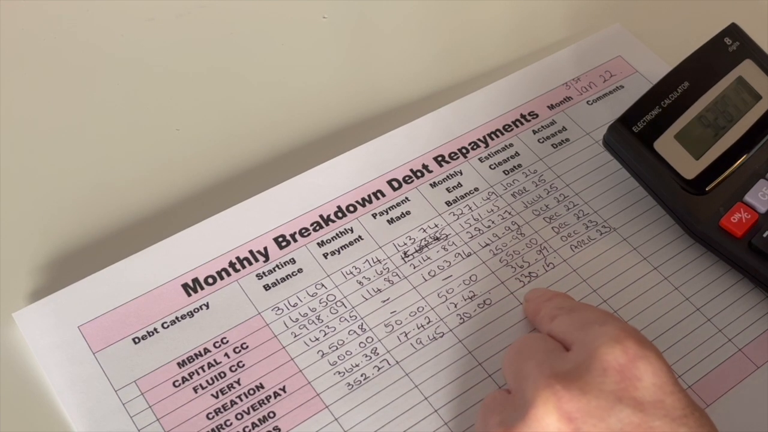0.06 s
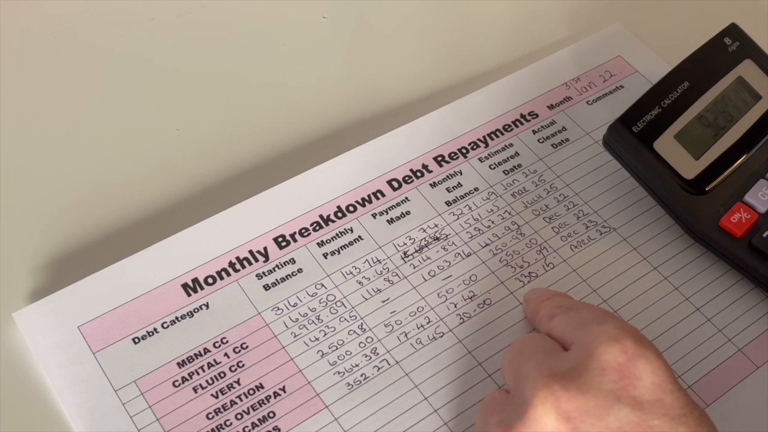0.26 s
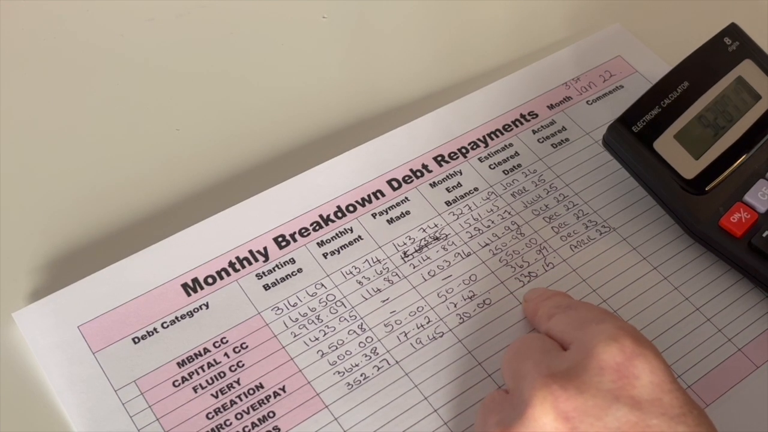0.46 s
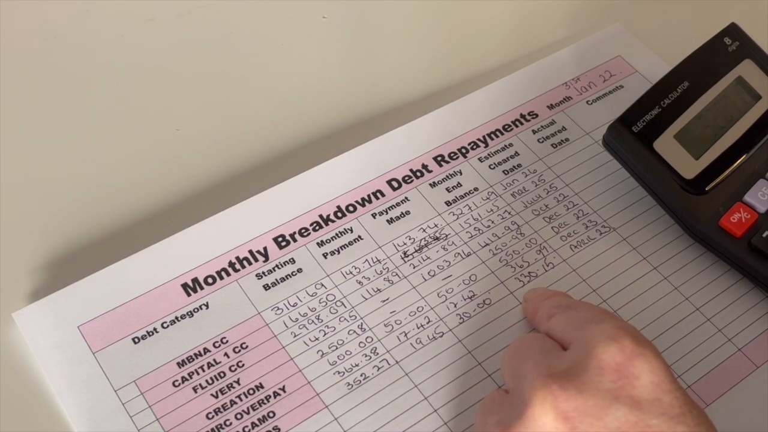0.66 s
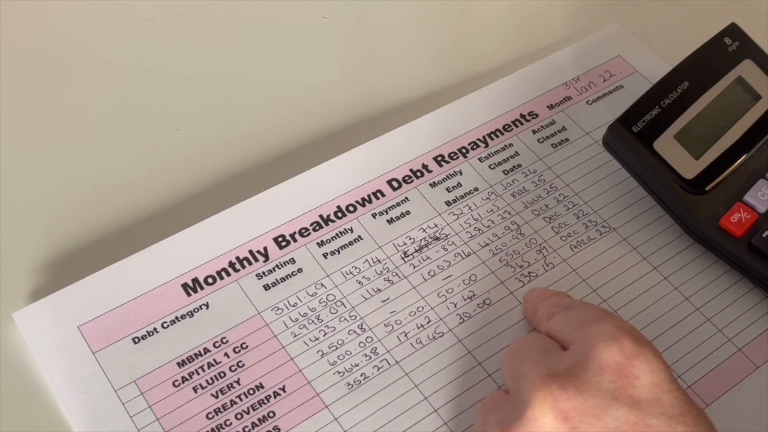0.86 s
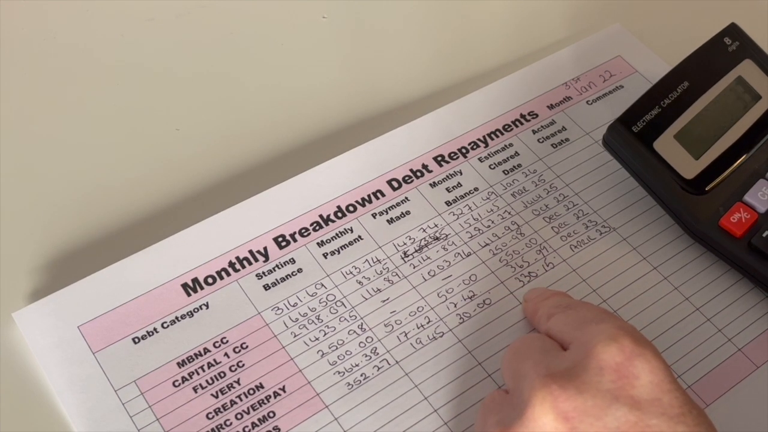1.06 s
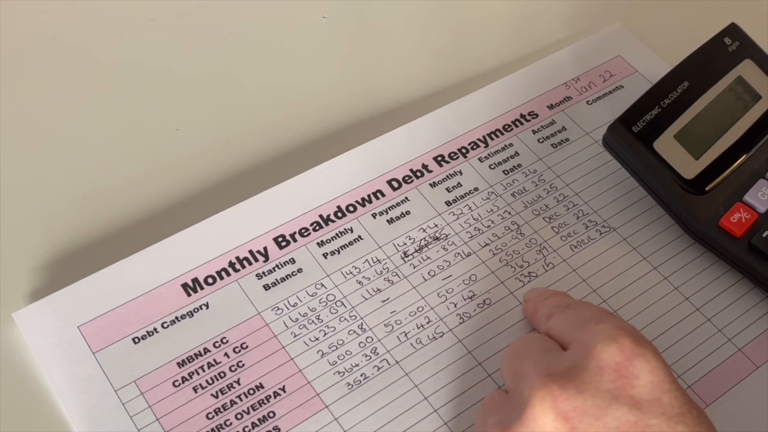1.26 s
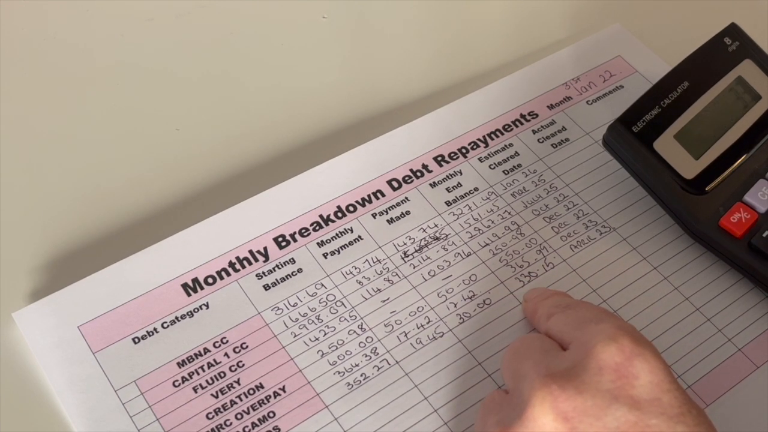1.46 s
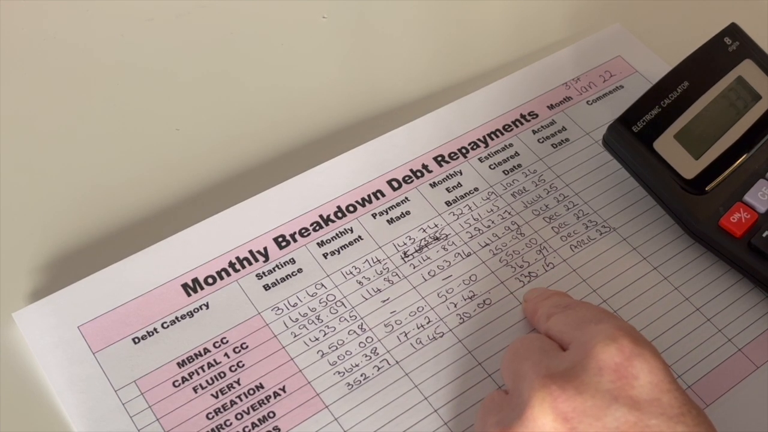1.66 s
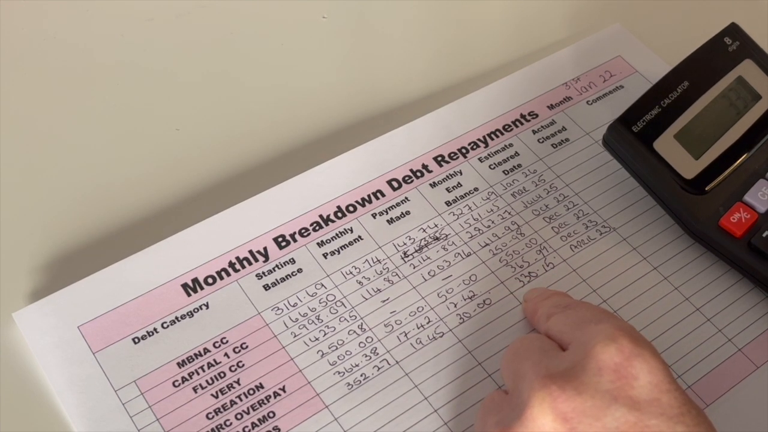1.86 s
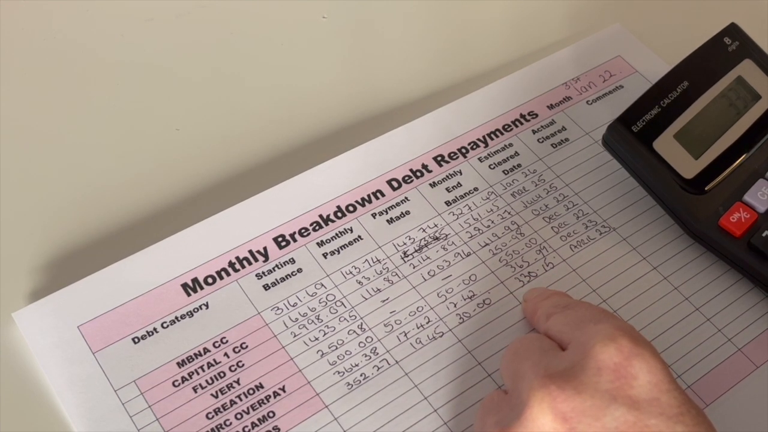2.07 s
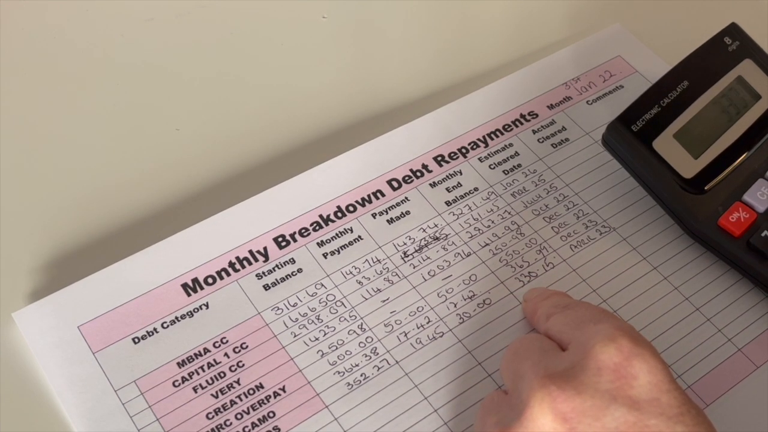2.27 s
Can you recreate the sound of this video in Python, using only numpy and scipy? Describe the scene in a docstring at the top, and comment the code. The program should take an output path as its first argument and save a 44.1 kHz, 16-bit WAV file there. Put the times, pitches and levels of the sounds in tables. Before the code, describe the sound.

Calculator buttons pressed one by one on a desk, dull thumps and clacking springbacks, quiet room

```python
"""A hand slides over paper in a small quiet room, over a low rumble; it slides again near the end.
Close to the microphone pair, five keys of a plastic desk calculator are tapped. Each key ticks under the finger
and bottoms out with a thump of calculator and desk; a tenth of a second later it springs back and the keycap
rattles against the case. Filtered noise makes the paper, pats, clicks, clatter and reflections; decaying
sines make the thumps and the ring of case and keycaps, and a falling sine the rubber dome of four keys."""
import sys
import numpy as np
from scipy import signal
from scipy.fft import rfft, irfft, next_fast_len
from scipy.io import wavfile

SR = 44100
rng = np.random.default_rng(int(sys.argv[2]) if len(sys.argv) > 2 else 0)


def materialize(psi):
    """Save the field psi as 16-bit PCM at rate SR to the path in sys.argv[1].

    A 1-D psi becomes a single channel; in a 2-D psi each row is a channel.
    """
    bounded = np.clip(np.atleast_2d(psi).T, -1, 1)
    quanta = np.round(bounded * 32767).astype(np.int16)
    wavfile.write(sys.argv[1], SR, quanta)


N = 101782
T = np.arange(N) / SR
SIZE = next_fast_len(N + SR // 2)
FREQS = np.maximum(np.arange(SIZE // 2 + 1) * SR / SIZE, 1)


def undb(db):
    """Decibels to gain."""
    return 10 ** (np.asarray(db) / 20)


def curve(points):
    """(frequency [Hz], value) points joined on a log-frequency axis."""
    hz, value = np.array(points, float).T
    return np.interp(np.log(FREQS), np.log(hz), value)


def level_over_time(points):
    """(time [s], level [dB]) points joined in decibels, returned as gain."""
    return undb(np.interp(T, *np.array(points).T))


def causal(db):
    """Minimum-phase response with the given gain per frequency, by folding the cepstrum."""
    cepstrum = irfft(np.log(undb(db)), SIZE)
    cepstrum[1:SIZE // 2] *= 2
    cepstrum[SIZE // 2 + 1:] = 0
    return np.exp(rfft(cepstrum))


def colour(points):
    """Causal response that keeps the power of white noise."""
    response = causal(curve(points))
    return response / np.sqrt(np.mean(abs(response) ** 2))


def through(x, response):
    """Filter a sound by a frequency response."""
    return irfft(rfft(x, SIZE) * response, SIZE)[..., :N]


def noise():
    """Two unrelated white noises."""
    return rng.standard_normal((2, N))


def fade(age, t60):
    """Exponential decay by 60 dB in t60 seconds."""
    return np.exp(-np.log(1000) * np.maximum(age, 0) / t60)


def since(start):
    """Seconds since a moment, zero before it."""
    return np.maximum(T - start, 0)


def swell_in(age, rise):
    """Exponential approach to full level."""
    return 1 - np.exp(-age / rise)


def ring(age, hz, t60, rise):
    """One mode that swells briefly and dies away."""
    return -np.sin(2 * np.pi * hz * age) * fade(age, t60) * swell_in(age, rise)


# how unlike the two microphones hear a sound: (frequency [Hz], share of unrelated sound [0-1])
PORT_SPREAD = [(60, 0.03), (120, 0.06), (250, 0.084), (600, 0.59), (1300, 1), (2300, 0.05), (4400, 0.017),
               (8000, .2), (15000, 0.44)]


def spread(pair):
    """Two unrelated sounds to left and right, as alike as the microphones hear them."""
    share = np.clip(curve(PORT_SPREAD), 0, 1) / 2
    mid = through(pair[0], np.sqrt(1 - share))
    side = through(pair[1], np.sqrt(share))
    return np.array([mid + side, mid - side])


# hand on paper: (start [s], fullest [s], end of hold [s], fade [s], level [dB])
SLIDES = [(0.0, 0.164, 0.22, 0.085, -65), (1.913, 1.967, 2.075, 0.14, -65.5)]
SLIDE_START_DB = -15  # relative to the fullest level
# hiss of the sheet: (frequency [Hz], relative level [dB per Hz])
PAPER_HISS = [(100, -70), (400, 5), (800, -6), (1550, -1.5), (1800, 1), (3000, -2), (5000, -6.5),
              (5700, -9), (7200, -12), (9500, -16), (12000, -12), (14300, -21), (15200, -72)]
# duller rubbing: (time [s], level [dB]), then its spectrum (frequency [Hz], relative level [dB per Hz])
RUB_LEVEL = [(0, -66.5), (0.1, -93), (0.26, -65), (0.36, -66.5), (0.43, -74.5), (0.52, -100)]
RUB = [(300, 8.5), (1000, -11), (1600, -8), (2000, 1.5), (2500, -16), (3500, -18), (6000, -28.5),
       (14000, -39)]
# low rumble of the hand on the desk: (time [s], level [dB]), then (frequency [Hz], relative level [dB per Hz])
RUMBLE_LEVEL = [(0, -57), (0.15, -61.5), (0.45, -60.5), (0.7, -58), (1.05, -60.5), (1.2, -82.5),
                (1.501, -61.5), (2.3, -59)]
RUMBLE = [(25, -9), (65, 9), (130, -7), (170, -17), (240, -5.5), (380, -20), (600, -25.5), (1200, -41),
          (4000, -53)]


def paper(grain_db=0.5, grain_hz=60):
    """The hand slides over the sheet: a grainy hiss that swells, holds and stops, a duller rub and a low rumble."""
    slide_level = np.zeros(N)
    for start, full, end, release, db in SLIDES:
        swell = undb(SLIDE_START_DB * np.clip((full - T) / (full - start), 0, 1))
        stop = np.clip(1 - since(end) / release, 0, 1) ** 2
        slide_level += undb(db) * (T >= start) * swell * stop
    slow_noise = through(noise()[0], colour([(grain_hz, 0), (grain_hz * 10, -60)]))
    grain = undb(grain_db * slow_noise)
    hiss = slide_level * through(noise(), colour(PAPER_HISS))
    rub = level_over_time(RUB_LEVEL) * through(noise(), colour(RUB))
    rumble = level_over_time(RUMBLE_LEVEL) * through(noise(), colour(RUMBLE))
    return spread(grain * (hiss + rub) + rumble)


# still room: (frequency [Hz], relative level [dB per Hz])
FLOOR = [(20, -30.5), (35, -5), (58, 3), (90, -4), (130, -11.5), (170, -16.5), (240, -21), (400, -27.5),
         (700, -32), (1300, -41), (2100, -42), (4000, -51), (7000, -53), (12000, -57.5), (16000, -76)]
FLOOR_DB = -59.5


def still_room():
    """The quiet room itself: steady noise, strongest in the bass."""
    return spread(through(noise(), colour(FLOOR))) * undb(FLOOR_DB)


# keycap touches its guide or stop: (time [s], level [dB], treble tilt [dB per octave])
CLICKS = [(0.5495, -61.5, -9.5), (0.5575, -44.5, -3.5), (0.5657, -59, -7), (0.6543, -52, -2.5),
          (0.668, -54, -7), (0.6704, -41.5, 2.5), (0.6724, -44, 2.5), (0.8268, -57, -8),
          (0.8342, -55.5, -6), (0.8380, -44, -0.5), (0.9517, -38, 3), (0.9540, -36.5, 0), (0.9602, -47, -3),
          (1.221, -79, 1), (1.489, -54.5, -4), (1.4971, -47.5, -4.5), (1.5068, -42.5, -3.5),
          (1.6005, -56.5, -13), (1.6051, -41, -0.5), (1.6109, -39, -0.5), (1.6223, -52.5, -11.5),
          (1.631, -50, -12), (1.7786, -57.5, -3), (1.7870, -52, -8), (1.7922, -51.5, -3),
          (1.7982, -59.5, -3.5), (1.9033, -50, -10), (1.9083, -37.5, -1), (1.9142, -34, 2.5),
          (1.922, -47, -9.5), (2.1147, -59.5, -3.5), (2.123, -54, -3), (2.1288, -47.5, -2),
          (2.225, -64, -5), (2.2298, -39, -1.5), (2.235, -49, -2), (2.2409, -48.5, 0)]
# keycap click: (frequency [Hz], relative level [dB per Hz])
KEYCAP = [(100, -15), (500, -2), (1000, -4.5), (1500, 0), (2500, 1.5), (3300, -0.5), (4000, 4), (4900, 4),
          (5900, -8), (6800, -7), (9500, -11), (12300, -8.5), (14000, -15.5), (16000, -48.5)]
# keycap ring: (frequency [Hz], relative level [dB], t60 [s])
KEYCAP_MODES = [(2613, -2, 0.026), (3950, -13.5, 0.038), (4565, -9, 0.018), (4676, -18, 0.013),
                (6640, -24, 0.029), (10800, -6, 0.02), (12570, -13.5, 0.016)]
# detune is a fraction of the mode frequency; detune and scatter are standard deviations
KEYCAP_RING_DB, KEYCAP_DETUNE, KEYCAP_SCATTER_DB = -4.5, 0.021, -2.5
CLICK_RISE_S, CLICK_HOLD_S, CLICK_T60_S = 0.00073, .0012, .014
TILT_PIVOT_HZ = 3590


def keycaps():
    """Loose plastic keys click with a short burst of noise at each contact and ring briefly."""
    out, plastic = np.zeros((2, N)), colour(KEYCAP)
    octaves = np.clip(np.log2(FREQS / TILT_PIVOT_HZ), -2, 2)
    for start, db, tilt_db in CLICKS:
        age = since(start)
        burst = np.minimum(age / CLICK_RISE_S, 1) * fade(age - CLICK_HOLD_S, CLICK_T60_S)
        click = through(burst * noise(), plastic)
        near = (age > 0) & (age < .05)  # the modes are computed for 50 ms only
        for hz, mode_db, t60 in KEYCAP_MODES:
            detune, size = rng.standard_normal((2, 2, 1))
            gain = undb(KEYCAP_RING_DB + mode_db + KEYCAP_SCATTER_DB * size)
            click[:, near] += gain * ring(age[near], hz * (1 + KEYCAP_DETUNE * detune), t60, CLICK_RISE_S)
        out += through(click, undb(db + tilt_db * octaves))
    return spread(out)


# fingertip lands and pushes the key down: (time [s], level [dB])
TOUCHES = [(0.551, -52.5), (0.828, -47.5), (1.493, -43), (1.7860, -46), (2.1220, -39.5)]
# soft pad on plastic: (frequency [Hz], relative level [dB per Hz])
PAD = [(60, -10), (230, 2), (450, -12), (800, -9.5), (1300, -23.5), (4000, -39), (12000, -39)]
TOUCH_RISE_S, TOUCH_T60_S = 0.0035, 0.074


def touches():
    """The finger pad gives a dull pat, a soft burst of noise, just before each key bottoms out."""
    level = np.zeros(N)
    for start, db in TOUCHES:
        age = since(start)
        level += undb(db) * np.minimum(age / TOUCH_RISE_S, 1) * fade(age, TOUCH_T60_S)
    return spread(through(level * noise(), colour(PAD)))


# key bottoms out, then key springs back, both as: (time [s], desk boom [dB],
# calculator rocking on its feet [dB], knock of the case [dB], contact bandwidth [Hz])
PRESSES = [(0.5609, -38.5, -27.5, -44, 855), (0.839, -41.5, -24.5, -34.5, 500), (1.5, -27, -40, -38, 740),
           (1.7919, -28, -64, -35, 390), (2.1270, -28.5, -25, -45, 820)]
RELEASES = [(0.6714, -49, -38.5, -40.5, 2460), (0.9526, -43.5, -36.5, -37, 1750),
            (1.6104, -72, -30, -32.5, 4100), (1.9136, -43, -28.5, -34, 5960),
            (2.2367, -65, -45.5, -43.5, 4000)]
DESK_HZ, DESK_T60_S = 87.85, 0.3
FEET_HZ, FEET_T60_S = 125.3, 0.16
THUMP_RISE_S = 0.0044


def thumps():
    """Every press and release rocks the calculator on its feet and makes the desk boom: two low modes."""
    out = np.zeros(N)
    for start, desk_db, feet_db, _, _ in PRESSES + RELEASES:
        age = since(start)
        out += undb(desk_db) * ring(age, DESK_HZ, DESK_T60_S, THUMP_RISE_S)
        out += undb(feet_db) * ring(age, FEET_HZ, FEET_T60_S, THUMP_RISE_S)
    return out


# calculator case on the desk, higher modes die sooner: (frequency [Hz], relative level [dB])
CASE_MODES = [(205, -13), (224, -8.5), (252, -11), (282, -7), (311, -9.5), (384, -14.5), (505, -9.5),
              (648, -32), (790, -19), (840, -12.5), (2018, -10), (2138, -26), (2418, -21), (2590, -41.5),
              (2700, -21)]
CASE_T60_S, CASE_T60_AT_HZ, CASE_DAMPING_SLOPE = .21, 250, .33
# dense short ring of the case: (frequency [Hz], relative level [dB per Hz])
CLATTER = [(60, -41.5), (150, 1), (280, 3), (420, -7.5), (600, -7), (800, -6.5), (1050, -27.5),
           (1350, -11.5), (2000, -11.5), (3200, -41.5), (6000, -30), (16000, -62)]
CLATTER_DB, CLATTER_T60_S = -4, 0.11
MODE_SCATTER_DB, KNOCK_RISE_S = 2.0, .001


def knocks():
    """Each blow rings the case; a soft contact spares the high modes."""
    out, shell = np.zeros((2, N)), colour(CLATTER)
    for start, _, _, db, contact_hz in PRESSES + RELEASES:
        age = since(start)
        clatter = undb(CLATTER_DB) * fade(age, CLATTER_T60_S) * swell_in(age, KNOCK_RISE_S)
        case = through(clatter * noise(), shell)
        for k, (hz, mode_db) in enumerate(CASE_MODES):
            t60 = CASE_T60_S * (CASE_T60_AT_HZ / hz) ** CASE_DAMPING_SLOPE
            size = undb(mode_db + MODE_SCATTER_DB * rng.standard_normal((2, 1)))
            polarity = np.array([[(-1) ** k], [rng.choice([-1, 1])]])
            case += size * polarity * ring(age, hz, t60, KNOCK_RISE_S)
        s = 1j * FREQS / contact_hz
        soft_contact = 1 / (1 + np.sqrt(2) * s + s ** 2)  # second-order low-pass
        out += undb(db) * through(case, soft_contact)
    return spread(out)


# rubber dome unfolds with a falling blip: (time [s], level [dB])
DOMES = [(0.6548, -34.5), (0.9366, -36.5), (1.6028, -36), (1.906, -34)]
DOME_START_HZ, DOME_END_HZ, DOME_GLIDE_S = 1300, 250, .0018
DOME_RISE_S, DOME_T60_S = .003, .06
DOME_ROUGH, DOME_ROUGH_HZ = 0.62, 500  # depth and bandwidth of the uneven level


def domes():
    """The rubber dome under a key unfolds unevenly; its pitch drops fast."""
    out = np.zeros(N)
    for start, db in DOMES:
        age = since(start)
        glide = (DOME_START_HZ - DOME_END_HZ) * DOME_GLIDE_S * swell_in(age, DOME_GLIDE_S)
        cycles = DOME_END_HZ * age + glide
        blip = np.sin(2 * np.pi * cycles) * swell_in(age, DOME_RISE_S) * fade(age, DOME_T60_S)
        out += undb(db) * blip
    slow = colour([(DOME_ROUGH_HZ, 0), (DOME_ROUGH_HZ * 10, -40)])
    return out * (1 + DOME_ROUGH * through(noise()[0], slow))


# room reflections: (frequency [Hz], level [dB])
ROOM = [(80, -17), (300, -11.5), (800, -10), (1400, -8), (2000, -12), (4500, -14.5), (7000, -9),
        (12000, -14.5), (16000, -17)]
ROOM_T60_S, ROOM_TREBLE_T60_S, ROOM_SPLIT_HZ, ROOM_DELAY_S = .25, 0.17, 1360, 0.0044


def room(x):
    """Dense reflections of a small furnished room, as decaying noise; the treble dies first."""
    age = since(ROOM_DELAY_S)
    low = 1 / (1 + (FREQS / ROOM_SPLIT_HZ) ** 2)
    walls = noise() * np.minimum(age / ROOM_DELAY_S, 1)
    tail = through(walls * fade(age, ROOM_T60_S), low)
    tail += through(walls * fade(age, ROOM_TREBLE_T60_S), 1 - low)
    tail = spread(tail / np.sqrt(np.sum(tail[0] ** 2)))
    return through(x, rfft(tail, SIZE) * causal(curve(ROOM)))


STROKE_LEAD_S = .04  # a stroke's share of the sound begins this long before its blow


def scene():
    """Paper, still room, keys and their reflections (a fresh noise tail drawn for each stroke)."""
    background = paper() + still_room()
    keys = keycaps() + touches() + knocks() + domes()
    stroke_starts = sorted(row[0] - STROKE_LEAD_S for row in PRESSES + RELEASES)
    stroke = np.searchsorted(stroke_starts[1:], T)
    walls = sum(room(keys.mean(axis=0) * (stroke == k)) for k in np.unique(stroke))
    return background + keys + thumps() + walls


# microphone pair: (frequency [Hz], phase by which left leads [rad])
PORT_PHASE = [(100, 0), (400, -.1), (900, -.5), (1400, -.1), (2000, .45), (4200, .27), (5300, 0),
              (6500, -1.3), (8000, -1.5), (9800, 1.9), (11000, .9), (12000, -.4), (16000, -.4)]
# microphone pair: (frequency [Hz], left minus right [dB])
PORT_BALANCE = [(120, 0.55), (350, 0), (700, 0.5), (1200, -2), (2500, -2), (5000, 1), (14000, -0.5)]
# notch in both microphones: (frequency [Hz], gain [dB])
NOTCH = [(7200, 0), (7900, -8), (8400, -24), (8700, -20), (9000, 0)]
LOW_CUT_HZ, TOP_HZ = 31, 15400


def record(dry):
    """Two microphone ports differ in phase and level and share a treble notch; deep bass and top are cut."""
    sides = np.array([[1], [-1]]) / 2  # half of each difference goes to either port
    phase = np.exp(1j * sides * curve(PORT_PHASE))
    balance = undb(sides * curve(PORT_BALANCE))
    heard = through(dry, phase * balance * causal(curve(NOTCH)))
    low_cut = signal.butter(2, LOW_CUT_HZ, "high", fs=SR, output="sos")
    top_cut = signal.ellip(8, .2, 70, TOP_HZ, fs=SR, output="sos")  # .2 dB ripple, 70 dB rejection
    return signal.sosfilt(top_cut, signal.sosfilt(low_cut, heard))


dry = scene()
out = record(dry)
materialize(out)
```